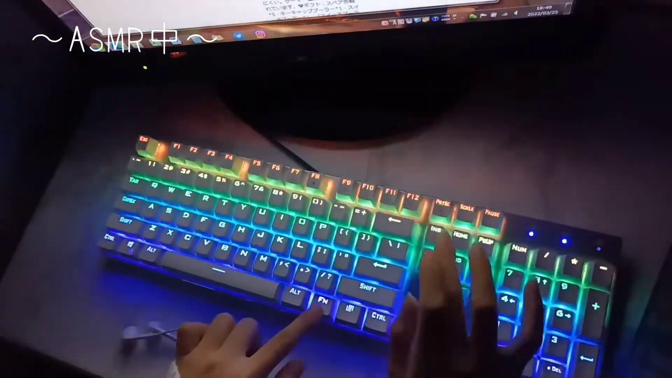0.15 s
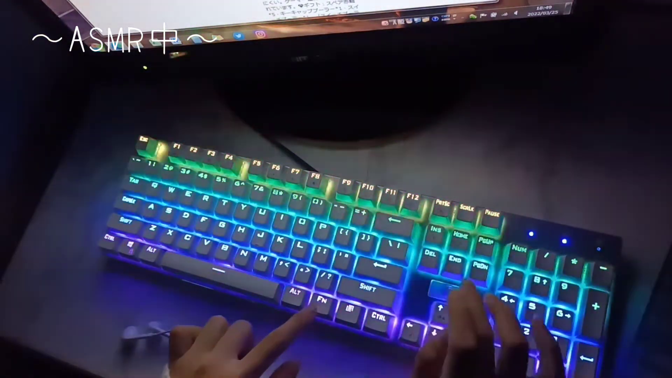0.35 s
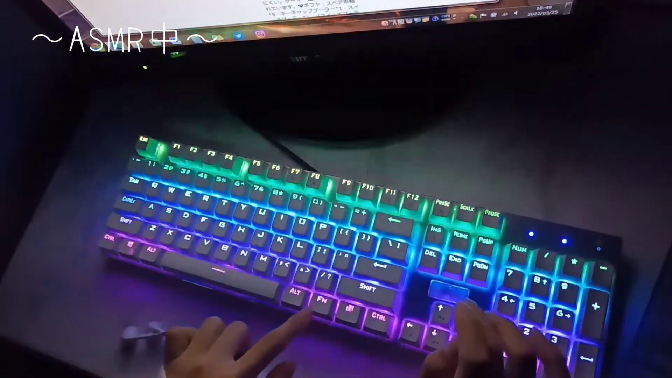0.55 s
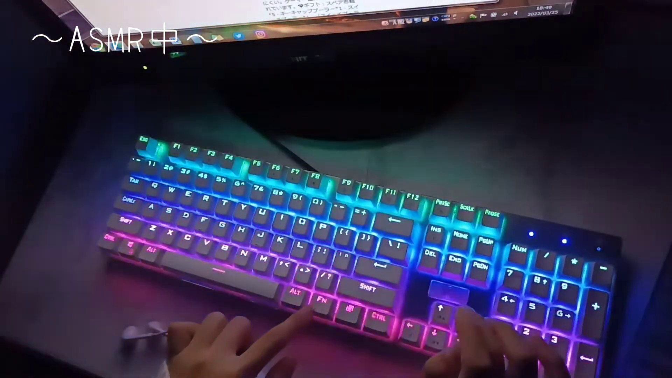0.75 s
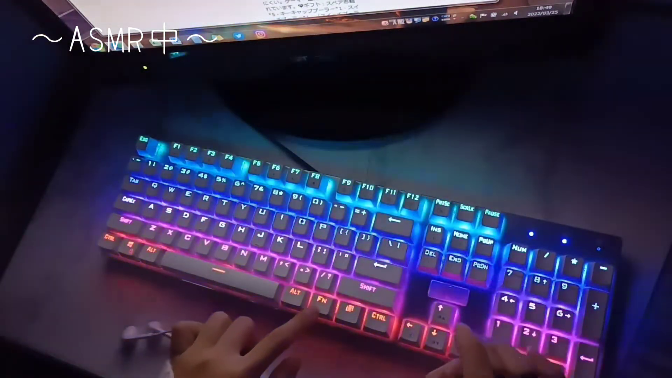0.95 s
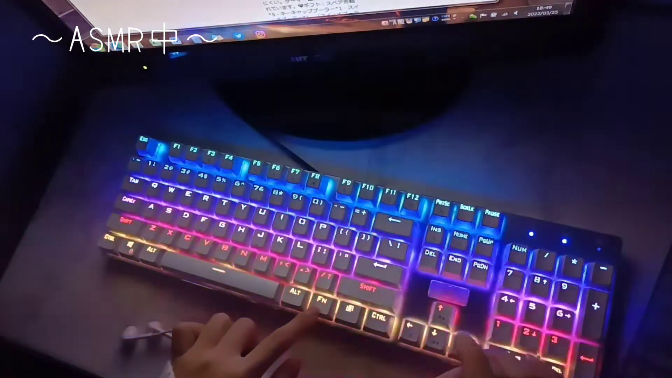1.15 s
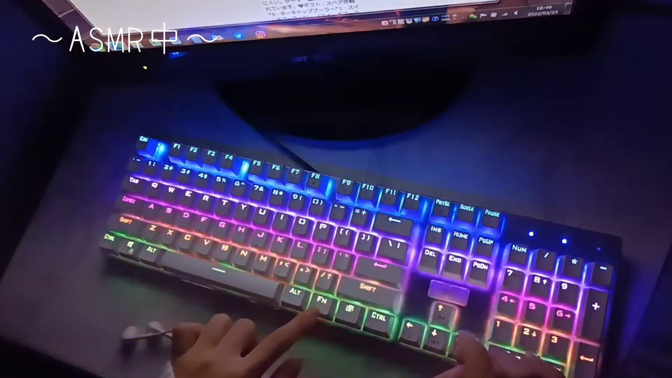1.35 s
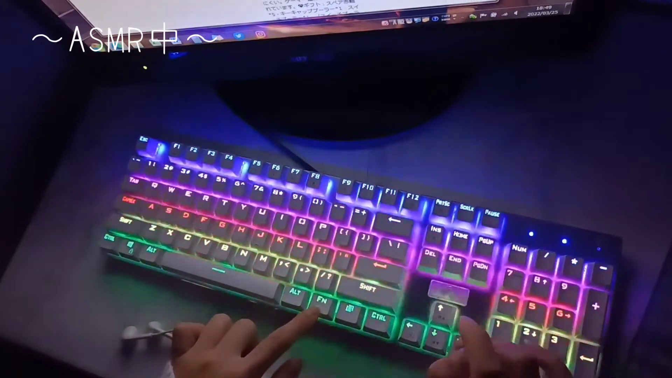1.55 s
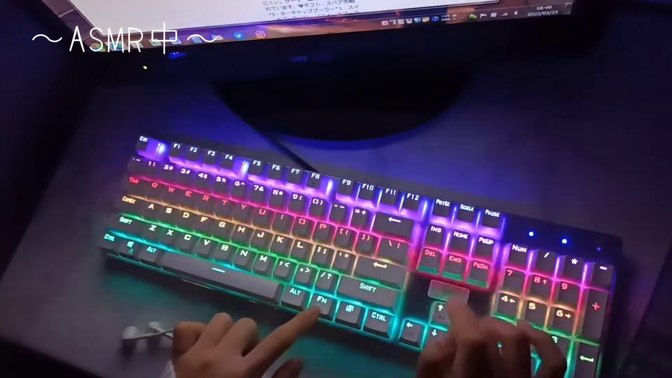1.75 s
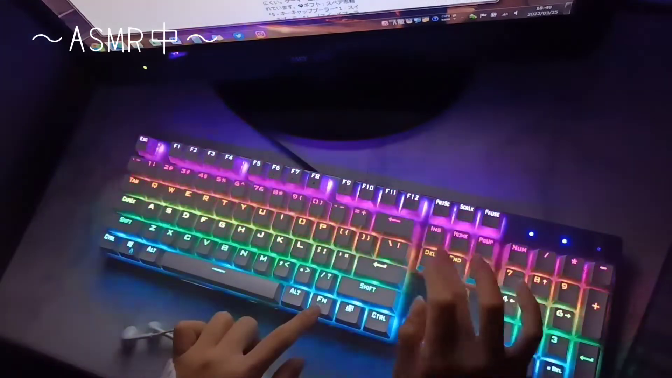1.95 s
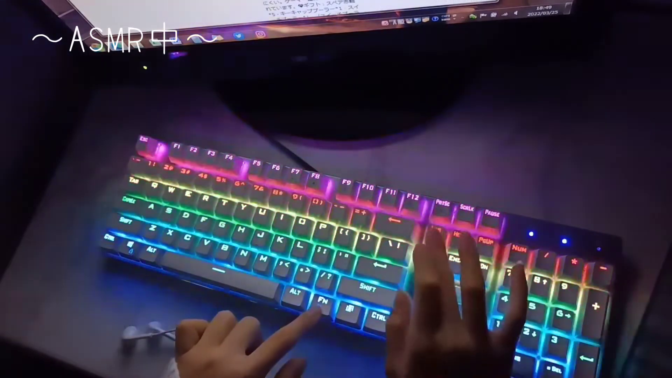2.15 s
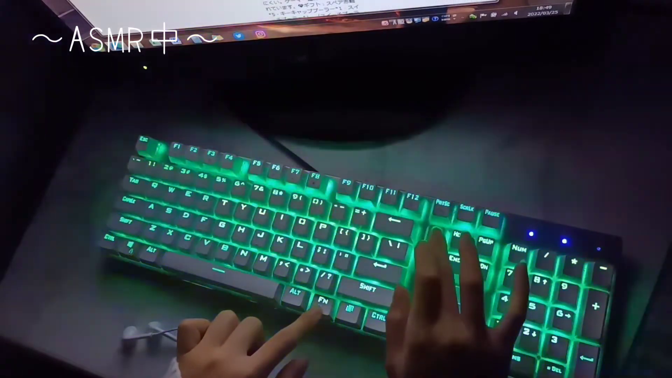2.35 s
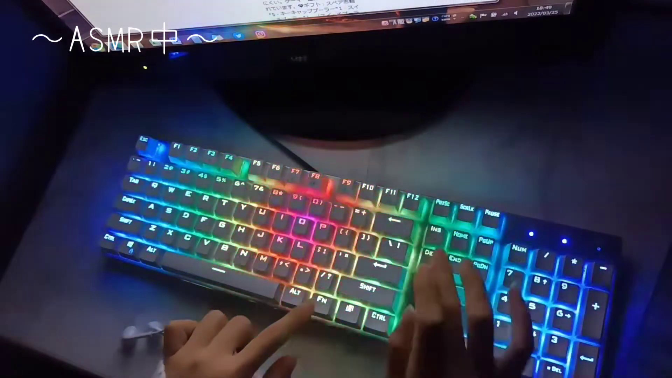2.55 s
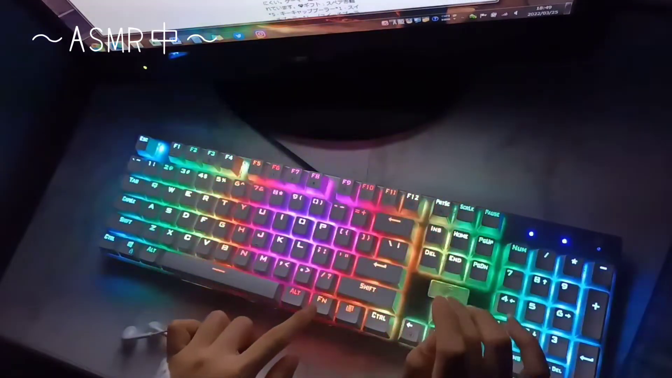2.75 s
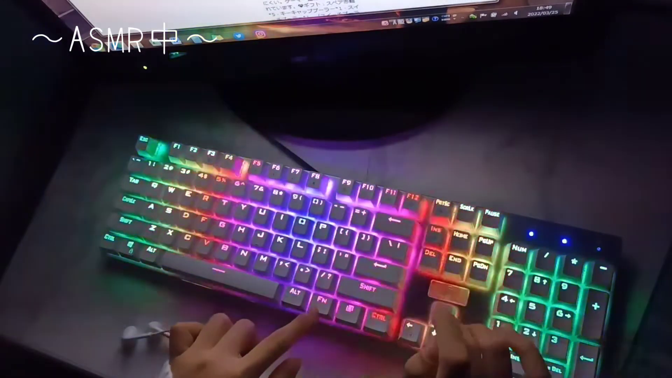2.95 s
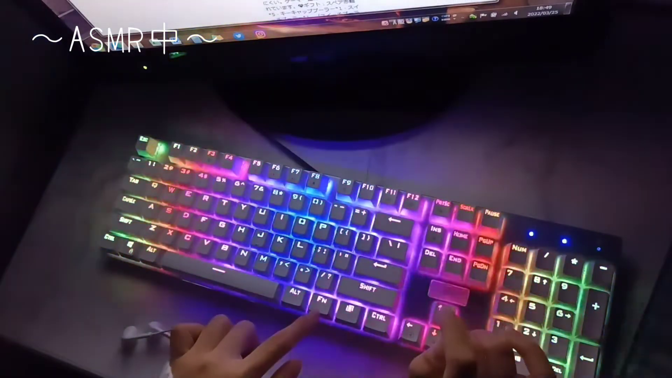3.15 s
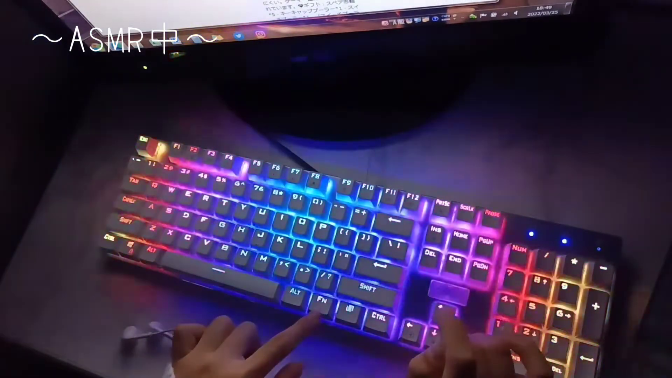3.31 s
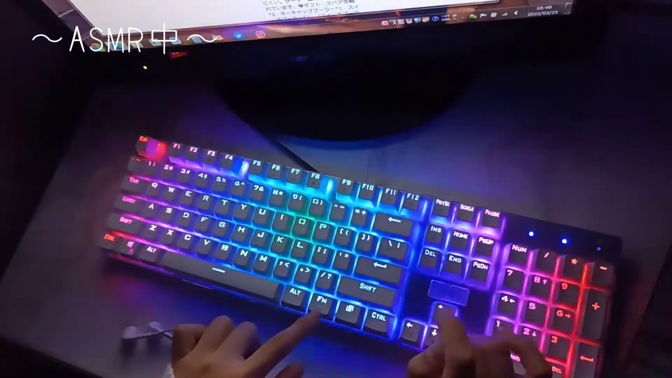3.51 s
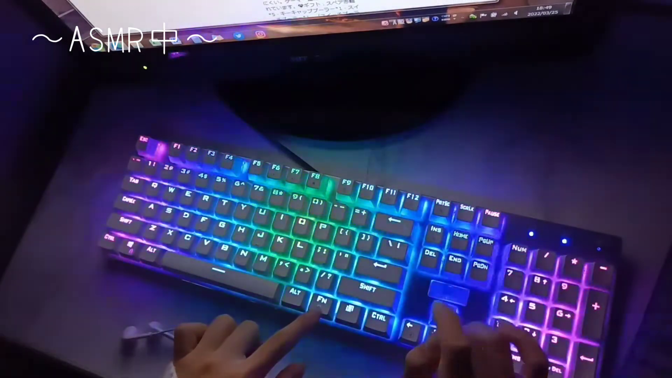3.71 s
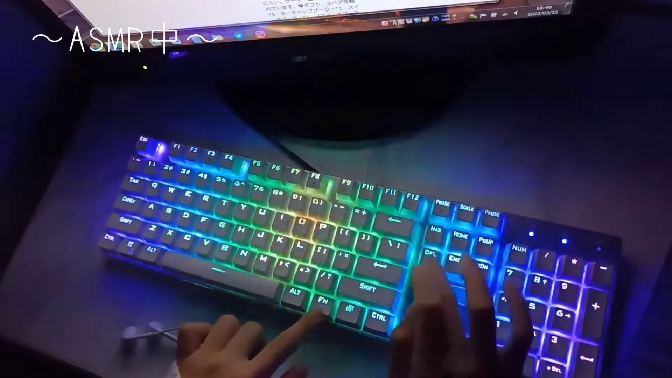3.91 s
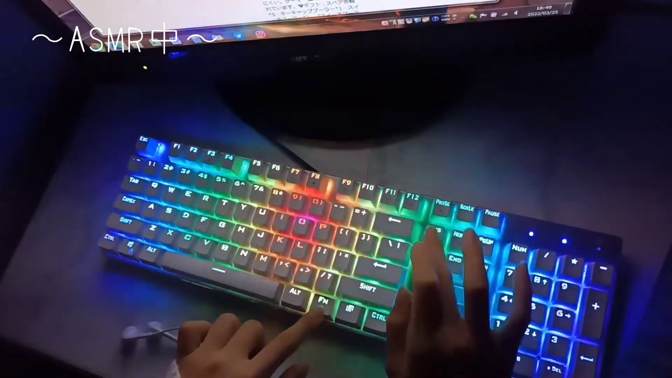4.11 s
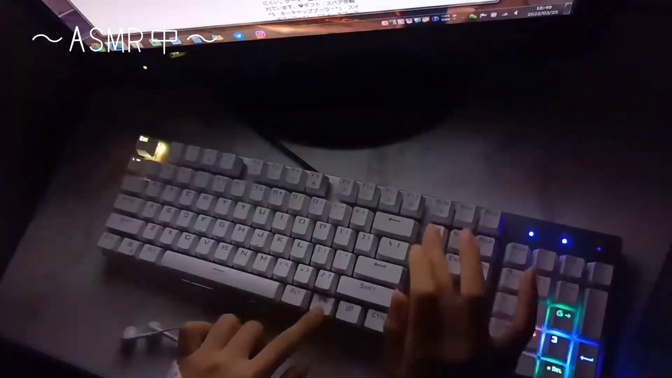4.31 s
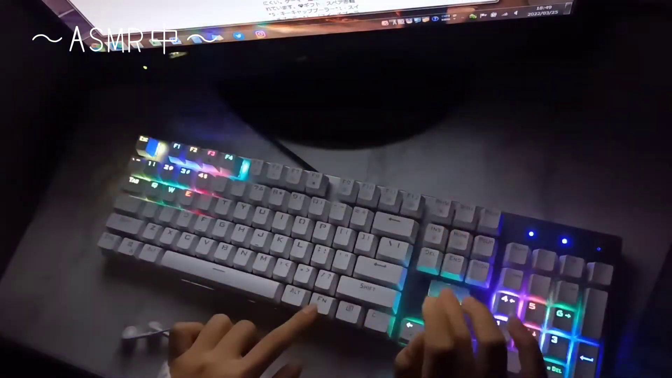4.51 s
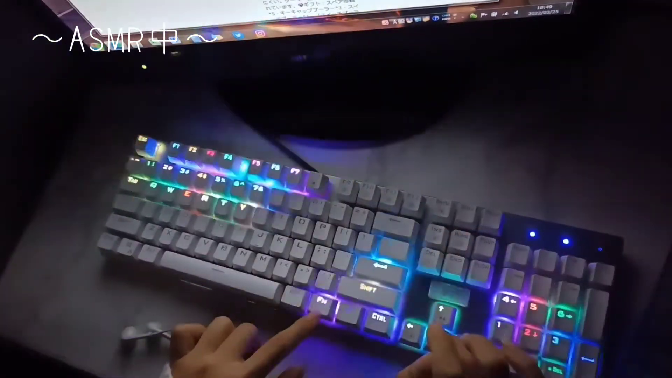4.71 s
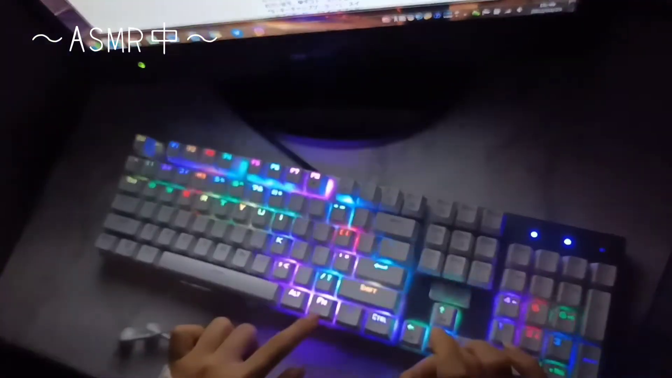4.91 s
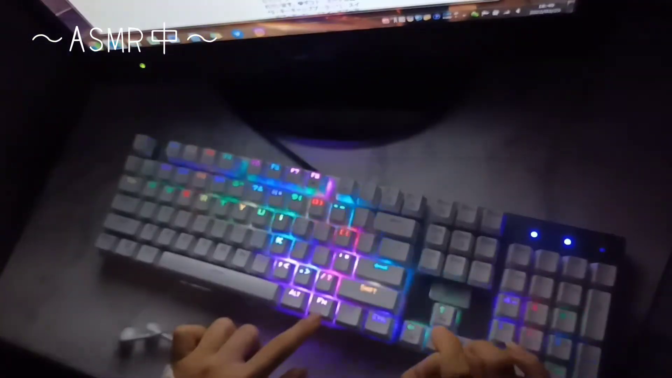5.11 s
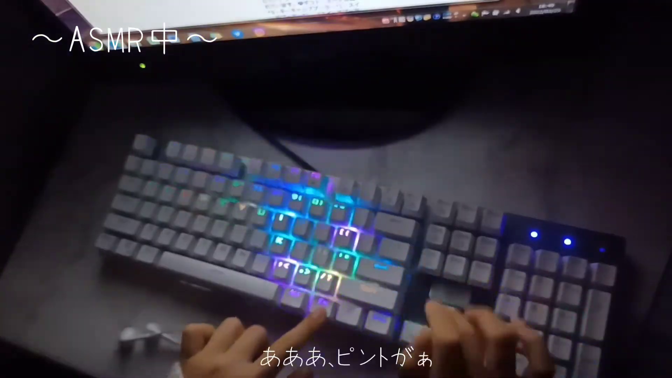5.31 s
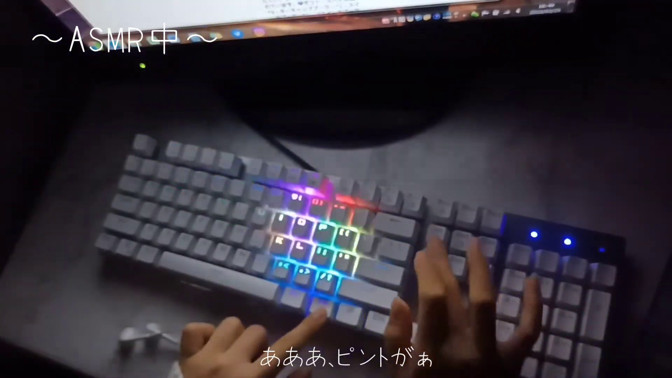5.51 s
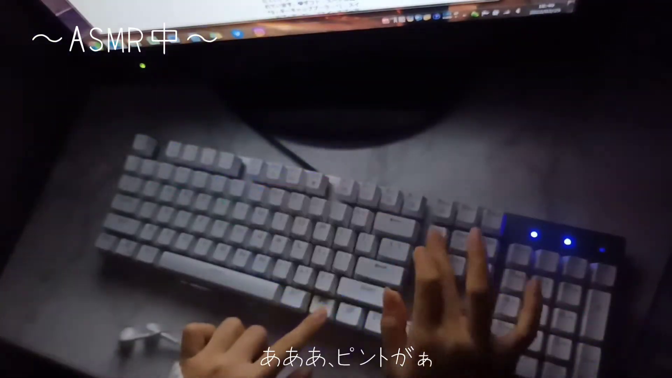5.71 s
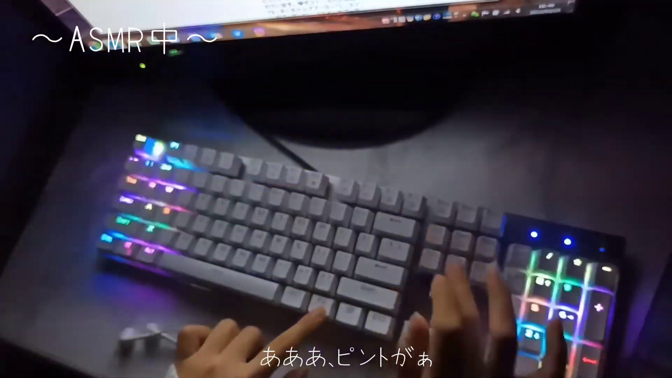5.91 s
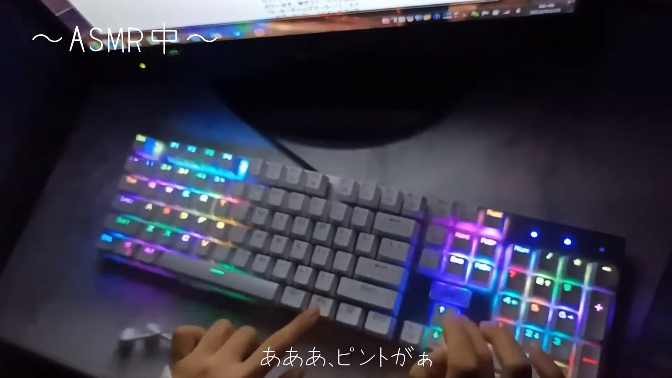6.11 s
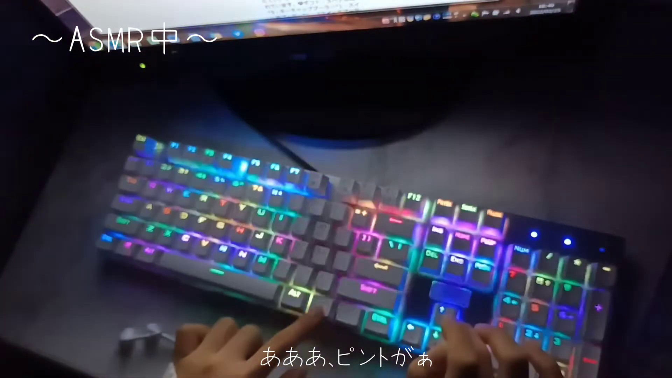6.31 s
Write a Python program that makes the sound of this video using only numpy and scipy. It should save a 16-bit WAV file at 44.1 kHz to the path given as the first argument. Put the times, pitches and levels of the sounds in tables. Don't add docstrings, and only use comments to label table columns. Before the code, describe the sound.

Sparse clusters of plastic key strokes, close and dry with a very short room tail. Each firm press gives a hollow knock on the plate, then a brighter clack as the key springs back, with small ticks and duller knocks from farther keys. Light skin friction accompanies the movements. Four groups are separated by pauses holding only steady hiss, low room air and barely perceptible electrical whine.

```python
import sys
import numpy as np
from scipy import signal
from scipy.fft import rfft, irfft, next_fast_len
from scipy.io import wavfile
from scipy.ndimage import uniform_filter1d

SR = 44100
rng = np.random.default_rng(int(sys.argv[2]) if len(sys.argv) > 2 else 0)


def convert_level_to_amplitude(level_db):
    exponent = np.asarray(level_db, float) / 20
    return 10 ** exponent


def persist_wave(psi):
    counts = np.round(np.clip(psi, -1, 1) * 32767).astype(np.int16)
    wavfile.write(sys.argv[1], SR, np.atleast_2d(counts).T)


N = 284886
HIT = 16384


def unit(x):
    return x / np.sqrt(np.mean(x ** 2) + 1e-20)


def along(points, hz):
    f, value = np.transpose(points)
    return np.interp(np.log(hz + 1), np.log(f + 1), value)


def noise(response):
    m = next_fast_len(N)
    spectrum = rfft(rng.standard_normal(m)) * response(np.fft.rfftfreq(m, 1 / SR))
    return unit(irfft(spectrum, m)[:N])


def resonances(modes, hz, scatter_db=0):
    total = 0
    for k, (centre, width, db) in enumerate(modes):
        strength = (-1) ** k * convert_level_to_amplitude(db + scatter_db * rng.standard_normal())
        damping = 1j * hz * width
        total = total + strength * damping / (centre * centre - hz * hz + damping)
    return total


# f/Hz, level/dB per Hz
RUMBLE = [(12, -19), (20, -8), (32, -48), (55, -22.5), (101, -10), (125, -5), (232, -3), (500, -9.5)]
# f/Hz, level/dB per Hz
HISS = [(500, -1), (700, -2.5), (1130, -4), (2500, -9), (4500, -10), (6830, -15.5), (10700, -17),
        (15500, -17.5)]
# f/Hz, level/dB rms
WHINE = [
    (2799, -101),
    (10266, -93),
]


def background():
    t = np.arange(N) / SR
    lines = sum(np.sqrt(2) * convert_level_to_amplitude(db) * np.sin(2 * np.pi * hz * t) for hz, db in WHINE)
    rumble = convert_level_to_amplitude(-69) * noise(lambda hz: convert_level_to_amplitude(along(RUMBLE, hz)) * (hz < 500))
    hiss = convert_level_to_amplitude(-66.5) * noise(lambda hz: convert_level_to_amplitude(along(HISS, hz)) * (hz >= 500) * (hz < 15720))
    return rumble + hiss + lines


def swells(rows):
    t = np.arange(N) / SR
    total = np.zeros(N)
    for s, db, rise, fall in rows:
        distance = (t - s) / np.where(t < s, rise, fall)
        total += convert_level_to_amplitude(db - 20 * distance ** 2)
    return total


# f/Hz, width/Hz, level/dB
SKIN = [(6940, 2500, -23), (8800, 890, 14), (10950, 6300, 23), (14000, 1300, -1)]
CAP = [(4400, 650, 6), (6170, 1500, -3.5)]
STEM = [(1022, 125, 0.5), (1580, 1020, -2.5), (2410, 2420, -5.5)]
# t/s of firmest touch, level/dB, rise/s, fall/s
STROKES = [(0.018, -73, 0.0092, 0.007), (0.088, -73, .02, .006), (0.2, -66, 0.063, .022),
           (0.28, -69, .035, 0.007), (0.394, -65, .03, 0.023), (2.297, -57.5, 0.03, 0.036),
           (2.388, -65, 0.011, .006), (2.472, -52.5, 0.03, 0.023), (2.634, -52.5, 0.036, 0.048),
           (3.96, -77, .04, .02), (4.085, -54.5, 0.023, 0.029), (4.21, -61.5, 0.033, .04),
           (4.308, -67, .015, .006), (4.405, -68, .025, .03), (4.455, -58.5, 0.014, 0.057),
           (5.355, -78, .06, .04), (5.715, -53, 0.039, 0.045), (5.775, -67, .005, 0.026),
           (5.829, -62, 0.01, 0.0066), (5.923, -53.5, 0.039, 0.037)]
# t/s of fastest travel,
# level/dB, rise/s, fall/s
TRAVELS = [(0.0, -44, .005, 0.012), (0.018, -54.5, 0.0072, .005), (0.075, -50.5, .005, 0.032),
           (0.17, -59.5, 0.0062, 0.041), (0.275, -64.5, 0.058, 0.0061), (2.285, -62.5, 0.019, 0.042),
           (2.367, -62, .008, 0.028), (2.478, -53.5, 0.044, .008), (2.638, -53.5, 0.033, 0.0079),
           (2.68, -69, 0.024, .08), (3.948, -66, .045, .04), (4.075, -67, 0.04, 0.041),
           (4.234, -59, .006, 0.0054), (4.295, -60, .008, .04), (4.403, -54, 0.027, 0.026),
           (4.446, -56, .005, 0.0061), (5.335, -67, 0.034, .03), (5.36, -57, .025, 0.028),
           (5.732, -62.5, 0.046, .005), (5.775, -52.5, 0.0042, 0.036), (5.828, -54, 0.017, 0.012),
           (5.885, -63, .015, .04), (5.95, -54, 0.032, 0.031)]


def slides():
    skin_noise, cap_noise, stem_noise = [
        noise(lambda hz: resonances(modes, hz) ** 1.29) for modes in (SKIN, CAP, STEM)]
    grain = unit(convert_level_to_amplitude(1.5 * unit(uniform_filter1d(rng.standard_normal(N), size=40))))
    skin, stem = swells(STROKES), swells(TRAVELS)
    cap = convert_level_to_amplitude(-9) * skin + convert_level_to_amplitude(-15.5) * stem
    return grain * (skin * skin_noise + cap * cap_noise + stem * stem_noise)


# f/Hz, t60/s
ROOM = [(200, 0.61), (1000, 0.19), (3000, 0.15), (8000, 0.12), (15000, 0.19)]


def room_tail():
    hz, t, z = signal.stft(rng.standard_normal(HIT // 2), SR, nperseg=256)
    decay = convert_level_to_amplitude(-60 * t / along(ROOM, hz)[:, None])
    tail = signal.istft(z * decay, SR, nperseg=256)[1]
    return np.pad(tail / np.linalg.norm(tail), (150, 0))


def struck(modes, chatter, loose, soft_hz):
    t, hz = np.arange(HIT // 8) / SR, np.fft.rfftfreq(HIT, 1 / SR)
    envelope = (1 - np.exp(-t / 0.00046)) * np.exp(-t / chatter)
    force = loose * envelope * rng.standard_normal(len(t))
    force[0] = 1
    softness = (1 + 1j * hz / soft_hz) ** 2
    z = rfft(force, HIT) * resonances(modes, hz, scatter_db=2.0) / softness
    return z / np.abs(irfft(z)).max()


# f/Hz, width/Hz, level/dB
RATTLE = [(1210, 520, 2.5), (1760, 360, 3), (2500, 910, -3.5)]
PLATE = [(217.7, 5.5, -3.5), (289.3, 15, -7.5), (789, 19.7, 0.5), (1409, 27, 2.5), (1471, 6.8, 0.5),
         (1430, 12, -4.5), (2176, 19, -5), (3590, 23, -6)]
DESK = [(139, 39, -3.5), (200.3, 14, 0), (285.4, 61, 0.5), (386, 117, -2.5), (633, 208, -0.5)]
CLACK = [(3460, 840, 2), (4370, 530, 4.5), (5870, 380, 6.5)]
CRACK = [(7090, 830, 2), (9300, 3500, -1), (11950, 420, -9), (13800, 2600, -11)]


def contacts(events, ring, thud_db, clack_db, crack_db, rattle_db, edge_hz, plate_db, wet_db):
    out = np.zeros(N + HIT)
    for s, db, bright_db, chatter in events:
        case = convert_level_to_amplitude(-4) * struck(ring, chatter, 0.03, soft_hz=9000)
        rattle = convert_level_to_amplitude(rattle_db) * struck(RATTLE, 1.3 * chatter, 1.0, soft_hz=4900)
        plate = convert_level_to_amplitude(plate_db) * struck(PLATE, chatter, 0, soft_hz=5850)
        desk = convert_level_to_amplitude(thud_db) * struck(DESK, chatter, 0.12, soft_hz=1200)
        clack = convert_level_to_amplitude(clack_db + bright_db) * struck(CLACK, 0.48 * chatter, 0.41, soft_hz=9200)
        crack = convert_level_to_amplitude(crack_db + bright_db) * struck(CRACK, 0.47 * chatter, 0.95, soft_hz=edge_hz)
        direct = case + rattle + desk + clack + crack
        spread = np.sqrt(np.abs(uniform_filter1d(np.abs(direct) ** 2, size=120)))
        room = convert_level_to_amplitude(wet_db) * spread * rfft(room_tail(), HIT)
        start = round(s * SR)
        out[start:start + HIT] += convert_level_to_amplitude(db) * irfft(direct + plate + room, HIT)
    return out[:N]


# t/s, level/dB peak, brightness/dB, chatter/s
TICK = [(0.1714, -55, 5, 0.0014), (2.0821, -49, -5, 0.0034), (2.3344, -61, -6, 0.0025),
        (2.365, -65, 4, 0.003), (2.3907, -34.5, -3, 0.018), (2.5216, -23, -5, 0.0066),
        (2.5324, -27.5, 2, 0.0072), (4.402, -45, 0.5, 0.0026), (4.429, -27, -2, 0.0091),
        (5.3137, -43, -7, 0.013), (5.3437, -51, 2, 0.002), (5.3536, -46, -3, 0.002),
        (5.3596, -47.5, -4, 0.0076), (5.9444, -49, 4, 0.0025), (5.977, -27, -1, 0.0055)]
# f/Hz, width/Hz, level/dB
TICK_RING = [(620, 110, -21), (684, 190, 2), (1160, 130, -4), (1590, 120, 3.5), (2333, 82, 8),
             (2870, 470, -1), (4700, 120, -5)]


def ticks():
    return contacts(TICK, TICK_RING, thud_db=-15, clack_db=-3.5, crack_db=-7.5, rattle_db=-11.5,
                    edge_hz=4400, plate_db=-20.5, wet_db=-11.5)


# t/s, level/dB peak, brightness/dB, chatter/s
TOUCH = [
    (3.879, -36.5, -4, 0.004),
    (4.238, -26, 0.5, 0.0059),
    (5.7373, -24, 4.5, 0.0078),
]
# f/Hz, width/Hz, level/dB
TOUCH_RING = [(1290, 130, -1.5), (1800, 73, -18), (2620, 140, -3), (3270, 78, -1), (3830, 65, -13),
              (4160, 210, 0), (5400, 130, -21), (6000, 280, -4)]


def touches():
    return contacts(TOUCH, TOUCH_RING, thud_db=-27, clack_db=-13.0, crack_db=-16, rattle_db=-15.5,
                    edge_hz=13500, plate_db=-25.5, wet_db=-16)


# t/s, level/dB peak, brightness/dB, chatter/s
FAR_RETURN = [
    (0.287, -25.5, 2.3, 0.0054),
    (0.311, -31, -2, 0.0048),
    (2.634, -40.5, 0, 0.0038),
    (2.679, -49.5, -2, 0.0033),
]
# f/Hz, width/Hz, level/dB
FAR_RETURN_RING = [(1040, 68, 5), (1510, 44, -1), (1590, 41, -5), (1930, 110, -11.5), (2230, 98, -16),
                   (2510, 100, -10), (3460, 470, -15), (4050, 160, -8.5), (4420, 270, -6.5)]


def far_returns():
    return contacts(FAR_RETURN, FAR_RETURN_RING, thud_db=-17, clack_db=-13, crack_db=-13.5, rattle_db=-11,
                    edge_hz=57000, plate_db=-20.5, wet_db=-11.0)


# t/s, level/dB peak, brightness/dB, chatter/s
FAR_KEY = [
    (0.113, -46, 2, 0.0093),
    (2.216, -25, 1.5, 0.0042),
    (3.272, -51, 2, 0.003),
    (3.976, -24, 3, 0.0058),
    (5.402, -37, -9, 0.013),
]
# f/Hz, width/Hz, level/dB
FAR_RING = [(563, 95, -24.5), (1045, 38, 1.5), (1610, 63, 2), (1926, 54, 1), (2236, 60, 2),
            (2520, 88, -0.5), (3120, 200, -7.5), (4420, 220, -15)]


def far_keys():
    return contacts(FAR_KEY, FAR_RING, thud_db=-19.0, clack_db=-14.5, crack_db=-15.5, rattle_db=-12,
                    edge_hz=1500, plate_db=-25.0, wet_db=-11.0)


# t/s, level/dB peak, brightness/dB, chatter/s
SIDE_RETURN = [
    (5.834, -25.5, 2.5, 0.0063),
    (5.838, -25.5, -17, 0.0037),
]
# f/Hz, width/Hz, level/dB
SIDE_RING = [(810, 45, 1), (1110, 91, 5), (1920, 76, 2), (2560, 70, -6), (2900, 80, -4), (3250, 67, -9),
             (4050, 87, -14), (4400, 86, -13)]


def side_returns():
    return contacts(SIDE_RETURN, SIDE_RING, thud_db=-13.5, clack_db=-1.5, crack_db=-4.0, rattle_db=-9,
                    edge_hz=23000, plate_db=-20, wet_db=-11)


# t/s, level/dB peak, brightness/dB, chatter/s
RETURN = [
    (0.097, -18, -2, 0.0067),
    (2.487, -25.5, 7, 0.0076),
    (2.492, -18, -7, 0.0049),
    (2.497, -36, -9, 0.0016),
    (4.316, -18, -2, 0.0059),
]
# f/Hz, width/Hz, level/dB
RETURN_RING = [(840, 98, 6.5), (975, 41, 15), (1113, 37, 21.5), (1453, 40, 20), (1770, 200, 6),
               (1930, 88, 11), (2130, 770, -22), (3360, 82, -4), (3990, 170, 17.5), (4550, 360, 5)]


def returns():
    return contacts(RETURN, RETURN_RING, thud_db=-16.5, clack_db=-3.0, crack_db=-4, rattle_db=-9,
                    edge_hz=25000, plate_db=-14, wet_db=-11.5)


# t/s, level/dB peak, brightness/dB, chatter/s
DEEP = [
    (4.259, -17.5, -0.84, 0.0027),
    (5.758, -18, -0.33, 0.0059),
]
# f/Hz, width/Hz, level/dB
DEEP_RING = [(1126, 57, 4.5), (1447, 33, 5), (1545, 130, -0.5), (1930, 120, 0), (2170, 47, -5),
             (2820, 100, 0), (3600, 61, -19), (4130, 200, -26), (5700, 300, -14.5)]


def deep_presses():
    return contacts(DEEP, DEEP_RING, thud_db=-28.5, clack_db=-15, crack_db=-15.0, rattle_db=-10.0,
                    edge_hz=5600, plate_db=-18.0, wet_db=-11.5)


# t/s, level/dB peak, brightness/dB, chatter/s
BOTTOM = [
    (0.025, -10, 2.5, 0.0022),
    (0.035, -23, -11, 0.0022),
    (2.401, -14.5, -0.5, 0.0042),
]
# f/Hz, width/Hz, level/dB
BOTTOM_RING = [(864, 160, -24), (1135, 58, 7), (1400, 57, 8), (1930, 150, 5.5), (2506, 52, -1.5),
               (2810, 67, 1.5), (3645, 140, -4), (4540, 88, -8.5)]


def bottom_outs():
    return contacts(BOTTOM, BOTTOM_RING, thud_db=-26.5, clack_db=-20.5, crack_db=-18.5, rattle_db=-13.0,
                    edge_hz=48000, plate_db=-23.0, wet_db=-12.5)


def scene():
    keys = bottom_outs() + deep_presses() + returns() + side_returns()
    keys += far_keys() + far_returns() + touches() + ticks()
    keys = signal.sosfilt(signal.butter(5, 125, "high", fs=SR, output="sos"), keys)
    return (keys + slides() + background())[None]


def top_cut(x):
    return signal.sosfilt(signal.butter(12, 16510, fs=SR, output="sos"), x)


def record(dry):
    limited = signal.sosfilt(signal.cheby2(9, 36, 15900, fs=SR, output="sos"), dry)
    mix = limited - 0.0004
    return top_cut(mix)


dry = scene()
out = record(dry)
persist_wave(out)
```